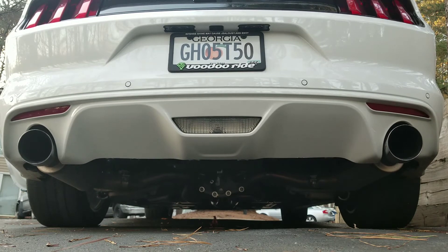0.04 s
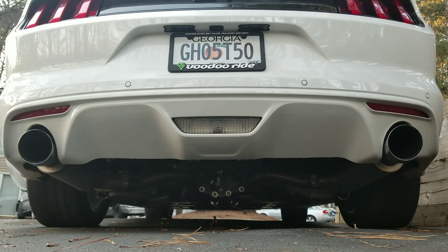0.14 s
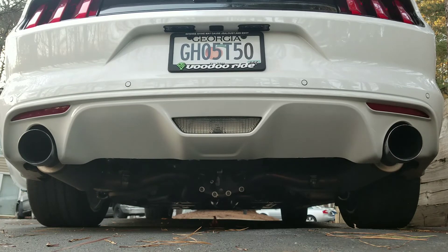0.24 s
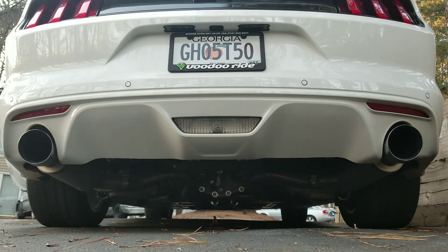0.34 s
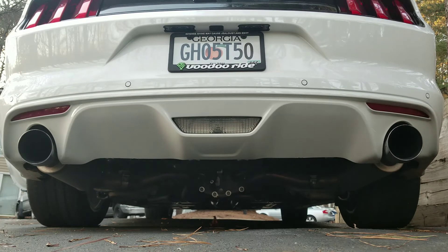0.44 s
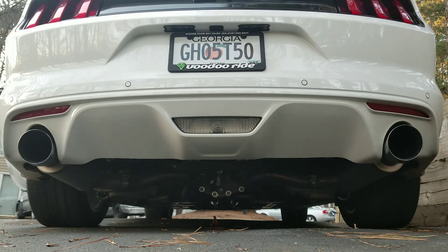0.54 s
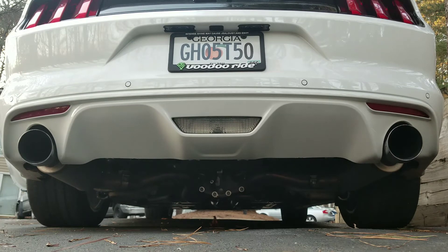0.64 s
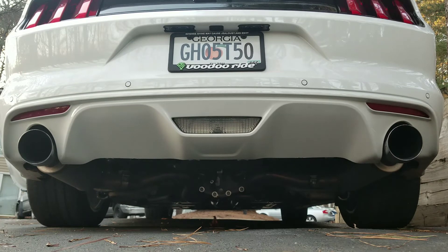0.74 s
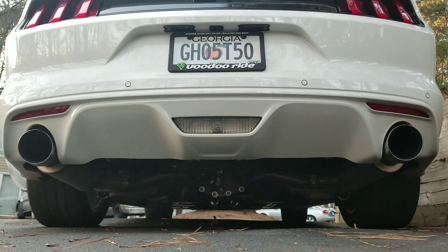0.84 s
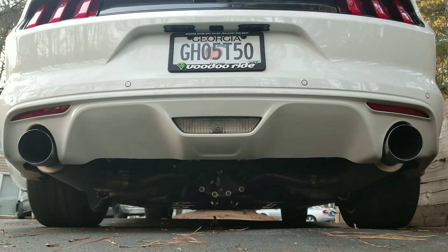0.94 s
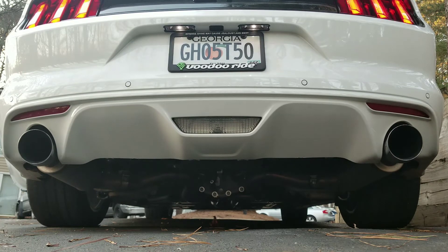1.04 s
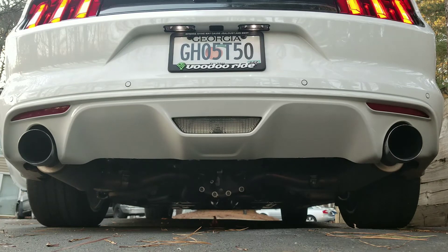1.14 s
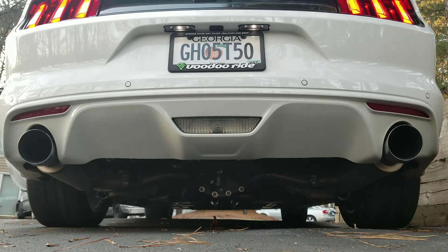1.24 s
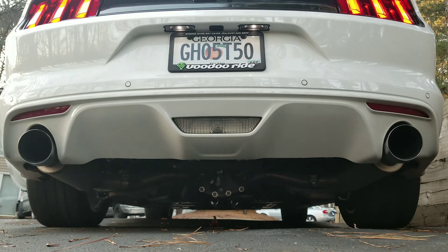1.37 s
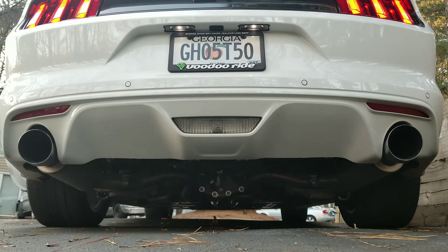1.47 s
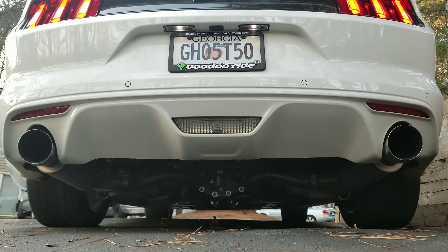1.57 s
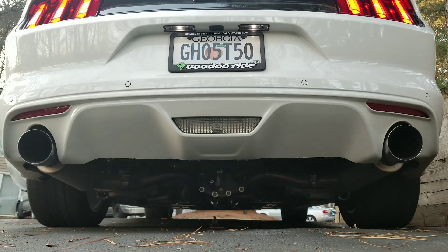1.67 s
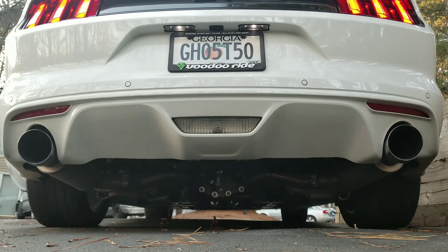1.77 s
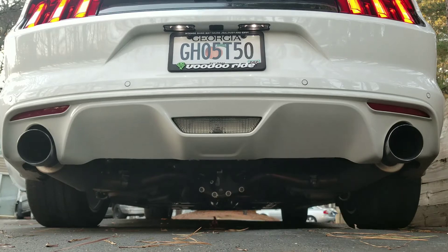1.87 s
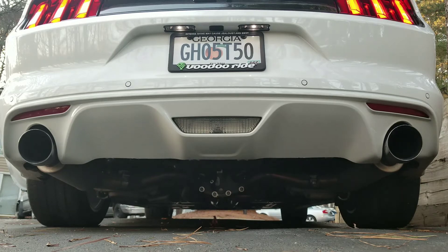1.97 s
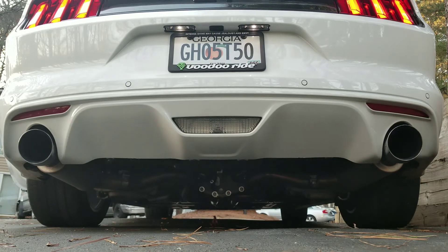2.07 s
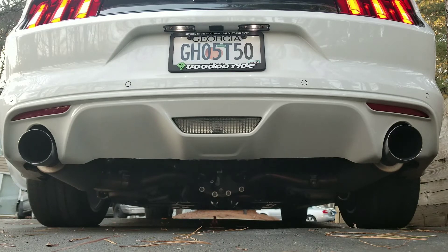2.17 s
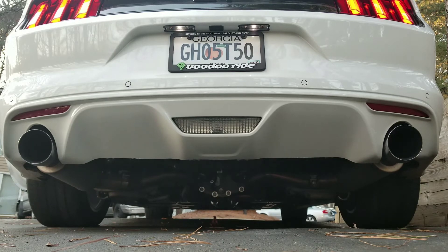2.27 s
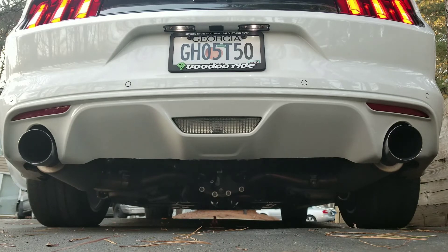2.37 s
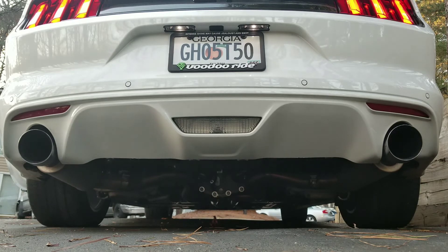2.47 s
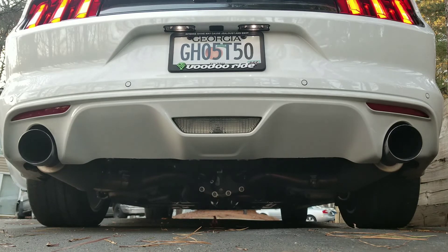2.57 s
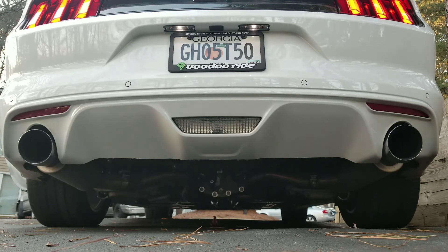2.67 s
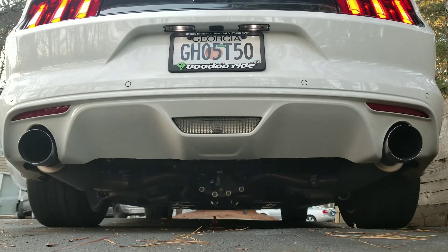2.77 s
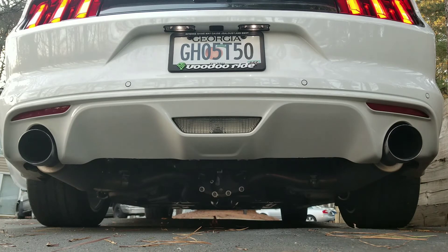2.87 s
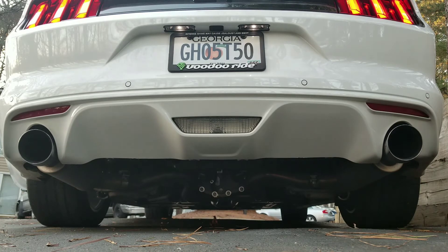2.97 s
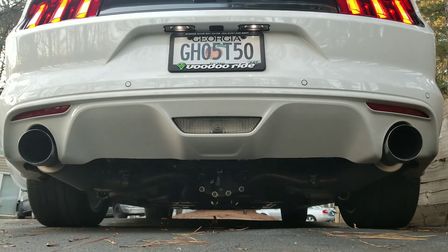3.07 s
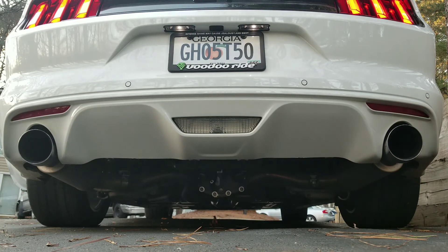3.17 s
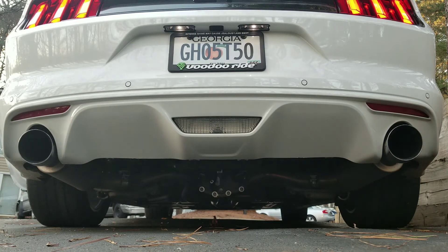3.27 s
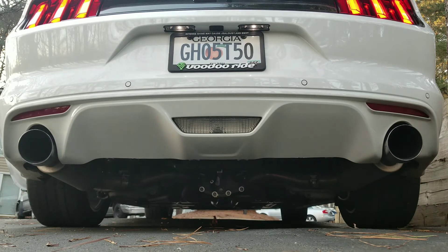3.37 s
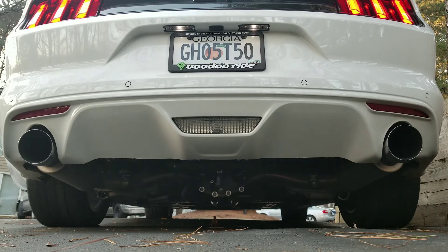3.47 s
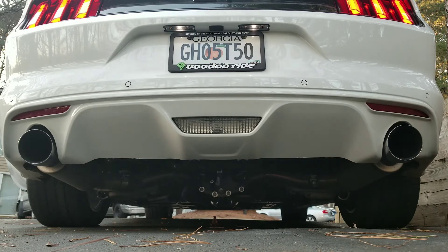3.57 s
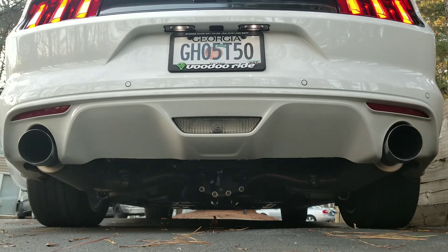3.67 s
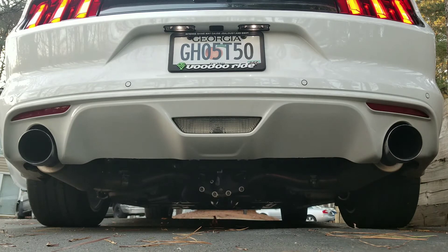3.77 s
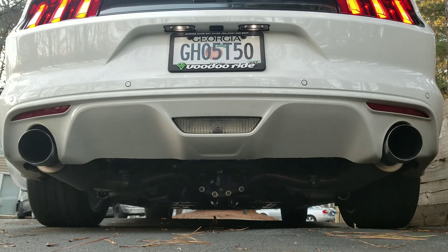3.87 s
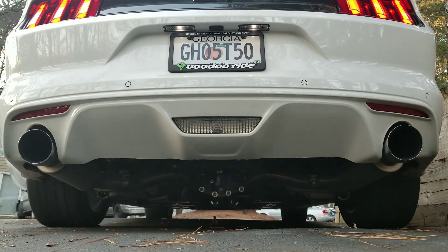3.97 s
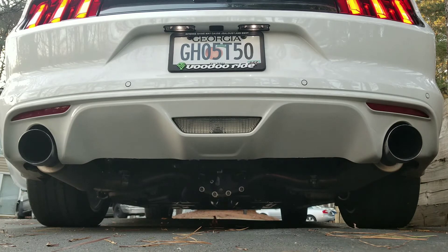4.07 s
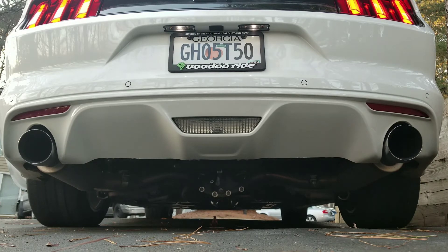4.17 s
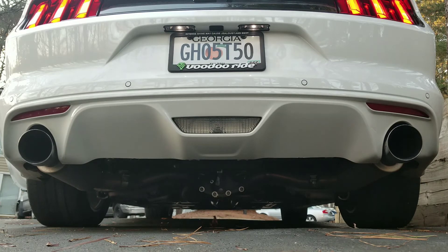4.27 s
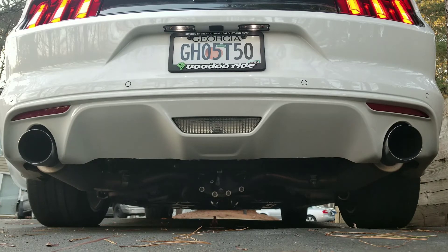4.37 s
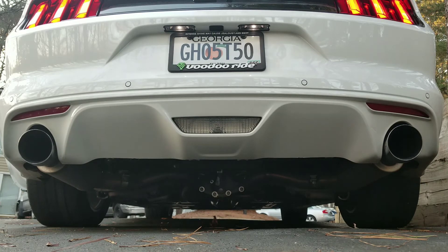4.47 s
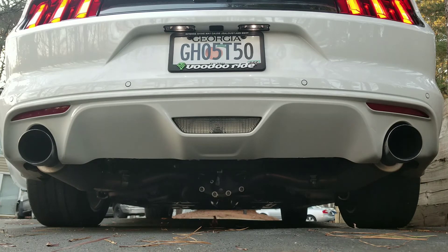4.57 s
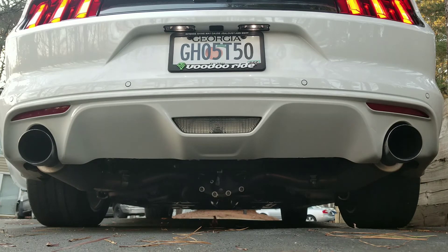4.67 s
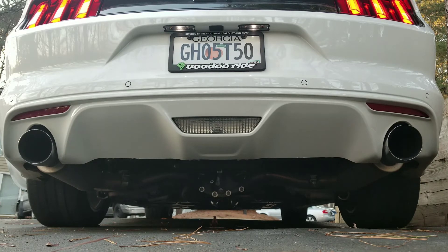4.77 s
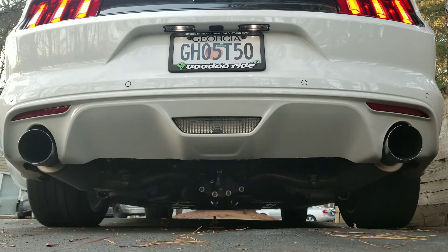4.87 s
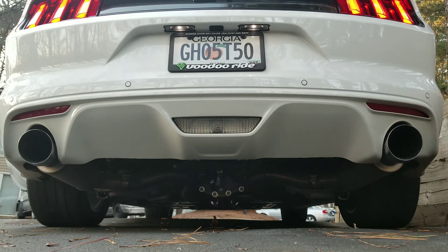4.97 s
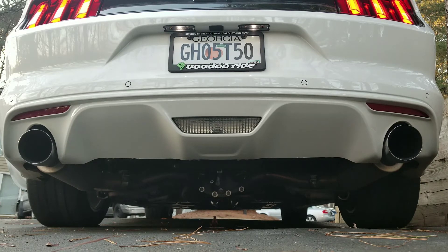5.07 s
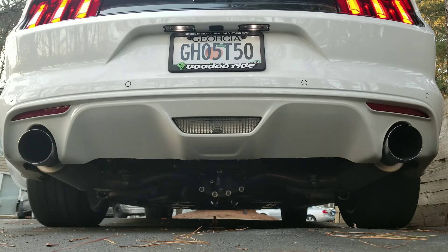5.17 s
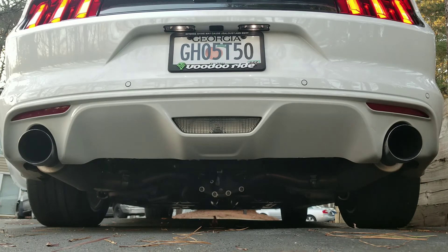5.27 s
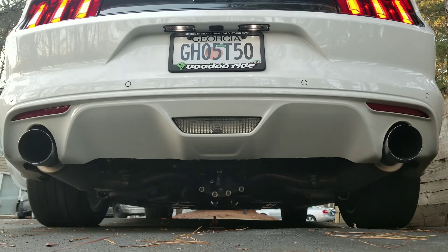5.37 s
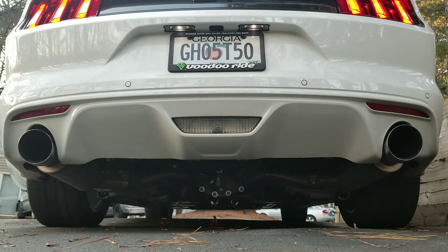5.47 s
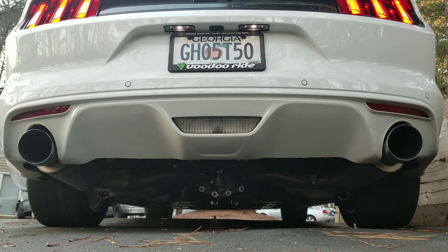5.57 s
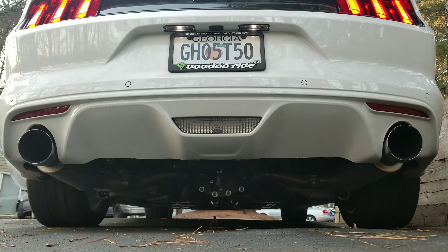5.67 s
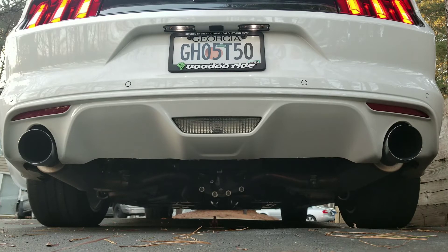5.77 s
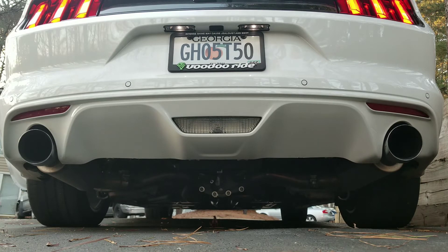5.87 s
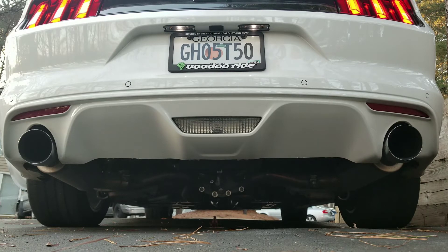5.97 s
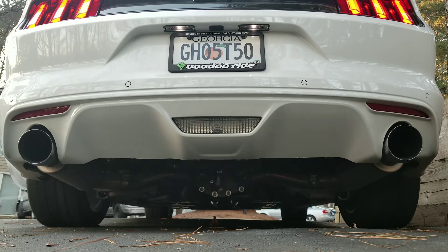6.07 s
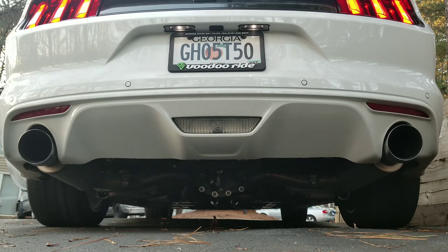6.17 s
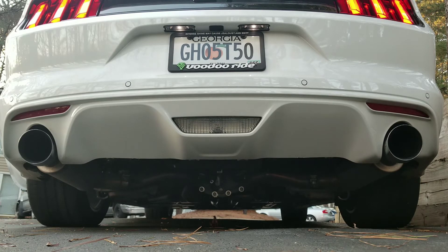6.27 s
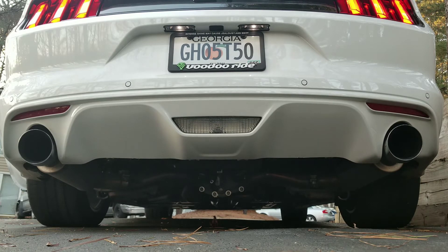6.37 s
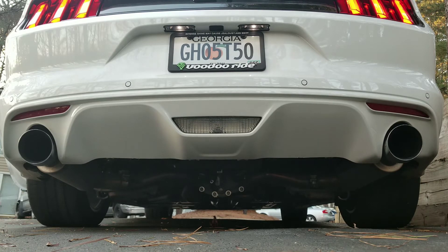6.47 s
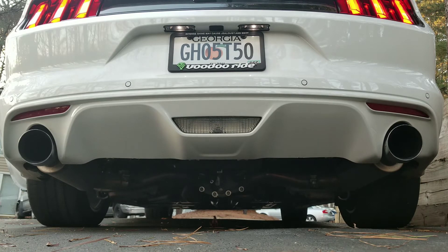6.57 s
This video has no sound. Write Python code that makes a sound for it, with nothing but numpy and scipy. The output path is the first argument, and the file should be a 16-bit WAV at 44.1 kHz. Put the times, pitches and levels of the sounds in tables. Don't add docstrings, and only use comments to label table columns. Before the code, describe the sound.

Outdoors, with stereo microphones low and close behind a car's twin tailpipes. From 0 s there is only a soft, dull hum of distant traffic, with the tail of a small metal rattle vanishing almost at once. At about 1.2 s the starter clashes into gear and grinds, a gritty metallic whine pulsing over about five compressions between 1.5 and 1.95 s, while hollow low puffs ring in the pipes. Around 2.0 s the V8 catches with a heavy, booming thump and flares loudly, barking and raspy, fastest from 2.2 to 2.6 s; a faint pinion whirr is buried beneath. The revs fall until roughly 3.5 s, leaving a deep, droning fast idle with a lumpy eight-beat burble, throaty rasp and slight gassy hiss. It dips a little near 3.5 s, grows somewhat fuller from 4.5 s, and continues steadily to the end at 6.6 s, still running.

```python
import sys
import numpy as np
from scipy import signal
from scipy.fft import rfft, irfft, next_fast_len
from scipy.io import wavfile
from scipy.ndimage import uniform_filter1d, minimum_filter1d

SR = 44100
rng = np.random.default_rng(int(sys.argv[2]) if len(sys.argv) > 2 else 0)


def transcribe(u):
    v = np.clip(np.atleast_2d(u).T, -1, 1)
    q = np.round(v * 32767).astype(np.int16)
    wavfile.write(sys.argv[1], SR, q)


def gain_from_db(level_db):
    decades = np.asarray(level_db, float) / 20
    return 10 ** decades


N = 291942
T = np.arange(N) / SR

# (frequency [Hz], density [dB per Hz])
TOWN_SPECTRUM = [(15, -47), (25, -25), (54, -6), (88, -2), (106, -0.5), (190, -3.5), (236, -11), (669, -13),
                 (1300, -23.5), (2760, -61), (8030, -54), (9170, -49), (14800, -63.5)]
TOWN_DB = -44.5

OVERRUN_S, OVERRUN_DB, OVERRUN_HZ, OVERRUN_FADE_S = 2.22, -54.5, 2660, 0.16

# (time [s], peak level [dB], ring [Hz], width [Hz])
PUFFS = [(1.199, -30.5, 92, 25), (1.319, -33, 113, 25), (1.402, -11.5, 89.26, 6.3), (1.409, -21, 46, 14),
         (1.428, -15.5, 88.26, 6.03), (1.405, -41.5, 218, 8.5), (1.41, -43.5, 301, 7),
         (1.53, -29, 61.5, 11), (1.61, -31, 47.6, 11), (1.62, -32, 125, 20), (1.69, -34.5, 88, 11),
         (1.76, -32.5, 112, 13.3), (1.799, -33.5, 47.3, 4), (1.901, -27, 68.2, 15), (1.975, -17, 113.2, 26),
         (2.008, -24, 714, 45), (2.016, -12, 47, 11), (2.047, -19, 325, 12), (2.011, 1, 113, 21.4),
         (2.0434, -5, 118, 11), (2.116, -6, 85.3, 14)]

# (time [s], grind level [dB], gear mesh [Hz])
STARTER = [
    (1.15, -33.5, 476.6),
    (1.3, -30, 552),
    (1.38, -31, 539),
    (1.44, -27.5, 494),
    (1.53, -36, 470.8),
    (1.97, -39, 447.8),
    (2.05, -40.5, 501),
    (2.3, -55, 514),
]
# (time [s], peak level [dB], length [s], housing knock [dB])
STROKES = [
    (1.52, -23, 0.078, -42),
    (1.631, -23, 0.068, -41),
    (1.73, -21.5, 0.059, -37),
    (1.818, -20, 0.06, -35.5),
    (1.907, -20.5, 0.12, -35.5),
]
# (frequency [Hz], width [Hz], level [dB])
HOUSING = [(442.8, 4.5, -2.5), (552, 26, -2), (829, 15, 3), (1023, 8.5, 7.5), (1182, 110, 0),
           (1305, 50, -1.5), (1890, 32, -3), (2122, 27, -11.5), (2320, 42, -8.5), (2553, 41, -10.5),
           (2930, 84, -17), (3320, 45, -12.5), (3900, 61, -9.5), (4090, 40, -10.5), (4200, 26, -27),
           (7250, 940, -26.5)]
# (frequency [Hz], density [dB per Hz])
GRIT_SPECTRUM = [(110, -28.5), (180, -18), (246, -14), (429, -8), (470, -9.5), (555, -8.5), (643, -4.5),
                 (1020, -8.5), (1320, -25.5), (1560, -18.5), (2390, -7.5), (5480, -26), (7500, -21),
                 (14800, -51)]
CLASH_S, CLASH_DB, CLASH_RISE_S, CLASH_FALL_S = 1.172, -17.5, 0.019, 0.014

# (time [s], firing rate [Hz])
FIRING_RATE = [(1.97, 42.6), (2.07, 56.5), (2.2, 104.21), (2.33, 107.2), (2.52, 107.24), (2.66, 104.04),
               (2.85, 96.3), (3.1, 88.26), (3.4, 86.51), (3.56, 83.04), (3.8, 85.06), (4.1, 85.9),
               (4.9, 85.44), (5.3, 84.8), (5.9, 85.19), (6.2, 86.02), (6.47, 84.74), (6.62, 84.7)]
# (time [s], bark level [dB])
EFFORT = [(2.004, -42.5), (2.013, -16.5), (2.06, -12), (2.2, -9), (2.35, -11.5), (2.55, -14), (2.87, -17.5),
          (2.98, -15.5), (3.1, -17.5), (3.5, -19.5), (4.0, -18), (4.6, -15.5), (5.0, -15), (5.7, -16),
          (6.2, -16), (6.62, -15.5)]
# (frequency [Hz], level [dB])
ORDER_RESPONSE = [(40, 5.5), (60, -13), (86, -0.5), (115, -1.5), (135, -13), (165, -42.5), (178, -26),
                  (195, -9.5), (220, -8)]
# (frequency [Hz], width [Hz], level [dB], signed polarity gain [1])
PIPE_MODES = [(109.7, 20.7, 0.67, -1.05), (129.5, 34.8, 1.5, 0.99), (168.6, 8.8, -6.5, 1.0),
              (253.8, 15, -11, 0.97), (285.3, 11, -13, 1.0), (334.4, 8.3, -21.5, 1.0),
              (405.6, 19, -21.5, -0.53), (445, 34, -16.5, -1.1), (511.8, 13.0, -14.5, -1.0),
              (540.6, 13.0, -15, -1.0), (627.0, 19, -16.5, -1.0), (698.3, 31.0, -22, -1.0),
              (751.8, 11, -22.5, -1.1)]
# (long route [dB], its lag [ms], short route [dB], its lead [ms])
IDLE = [(0.8, 0.44, -4, 3.5), (1.3, -0.85, -8, 2.7), (-3.5, -0.23, -3, 3.4), (-6.5, 0.2, -7, 2.8),
        (0.46, -0.82, -6.5, 3.7), (-0.9, -0.5, -12, 5.5), (-2.5, 0.2, -11, 5.1), (-4, 0.69, -6.5, 3.6)]
# (long route [dB], its lag [ms], short route [dB], its lead [ms])
FLARE = [(3.0, -0.6, -12, 4.7), (-4.5, -1.4, -7.5, 5.7), (-4, -1.8, -18.5, 6.4), (-3.5, -0.1, -2.5, 5.7),
         (-1.5, -1.5, -5, 6.7), (-0.5, -1.3, 0.7, 5.3), (-4, -0.1, -15.5, 7.9), (-5.5, -0.9, -1.4, 4.7)]
# (long route [dB], short route [dB])
WARMING = [(0.4, 0.6), (0.15, 2.1), (1, -0.2), (1.2, -0.1), (-0.8, -0.7), (0.05, -0.5), (0.1, .3),
           (-1.3, -0.4)]
# (frequency [Hz], width [Hz], level [dB])
RASP_MODES = [(655, 32, 1.5), (716.6, 30, 11.5), (762, 77, 2.5), (746, 47, -11), (785, 22, -20),
              (870, 15, -24), (905, 10, -25), (720, 130, -6), (1310, 50, -36.5), (1430, 14, -30)]
# (flare [dB], settling [dB], warm [dB], warm lag [ms])
RASP_DRIVE = [(1.5, -6, -7, 0.073), (-5.5, -7, -10, 0.13), (-4.5, 1, 4, 3.5), (0.5, -5, -5.5, 0.2),
              (-6.5, -5, -3.5, 0.077), (0.5, 2.5, -7.5, 0.048), (-4.5, -1, -1.5, 0.11),
              (-10, -10.5, -10.5, 0.075)]
# (frequency [Hz], density [dB per Hz])
HISS_SPECTRUM = [(560, -30.5), (950, -4), (1020, -9.5), (1120, -10), (1470, -15), (1580, -26), (1960, -19),
                 (2200, -23.5), (3290, -22.5), (5780, -32), (8070, -34.5), (9050, -48), (13100, -34.5),
                 (14800, -43.5)]

PHASE_REF_S = 2.2
TUNED_HZ = 83.5
BOOM_DB, ABOVE_DB_PER_HZ, BELOW_DB_PER_HZ = 7, -0.33, -0.4
HISS_DB, HISS_DB_PER_HZ = -33.5, -0.2542
TICK_DB, TICK_LAG_S, TICK_S = -9.5, 0.0038, 0.002
SETTLE_S, SHIFT_S, WARM_S, WARM_UP_S = 2.7, 0.25, 4.4, 0.64
ALIKE_HZ = 110


def curves(table):
    s, *columns = np.transpose(table)
    return [np.interp(T, s, c) for c in columns]


def unit(x):
    return x / np.sqrt(np.mean(x ** 2))


def on_log(table, hz):
    points = np.transpose(table)
    return np.interp(np.log(np.maximum(hz, 1)), np.log(points[0]), points[1])


def colour(x, table):
    size = next_fast_len(N)
    bins_hz = np.arange(size // 2 + 1) * SR / size
    return unit(irfft(rfft(x, size) * gain_from_db(on_log(table, bins_hz)), size)[..., :N])


def ring(x, hz, width_hz):
    return signal.lfilter(*signal.iirpeak(hz, hz / width_hz, fs=SR), x)


def decay(x, fall_s):
    return signal.lfilter([1], [1, -np.exp(-1 / (fall_s * SR))], x)


def lowpass(x, order, hz):
    return signal.sosfilt(signal.butter(order, hz, fs=SR, output="sos"), x)


def clicks(times_s, sizes):
    at = np.clip(times_s * SR, 0, N - 2)
    whole = at.astype(int)
    part = at - whole
    return np.bincount(whole, sizes * (1 - part), N) + np.bincount(whole + 1, sizes * part, N)


def walk(rate_hz):
    k = int(SR / rate_hz)
    held = np.repeat(rng.standard_normal(N // k + 1), k)
    return uniform_filter1d(uniform_filter1d(held, k), k)[:N]


def pair(x, lag_ms, pan_db):
    return np.array([gain_from_db(pan_db / 2) * np.interp(T - lag_ms / 1000, T, x), gain_from_db(-pan_db / 2) * x])


def wide(table, likeness):
    mid, side = rng.standard_normal((2, N))
    share = np.sqrt((1 - likeness) / (1 + likeness))
    return colour(np.array([mid + share * side, mid - share * side]), table)


def town():
    out, swell = 0, walk(0.5)
    for hz in 28 * 2 ** np.arange(0, 9.2, 0.5):
        noise = rng.standard_normal((2, N))
        mid, side = ring(ring(noise, hz, hz / 2.9), hz, hz / 2.9)
        level_db = on_log(TOWN_SPECTRUM, hz) + 1.5 * swell + 2.0 * walk(9)
        out = out + gain_from_db(level_db) * (mid + min(hz / 600, 1) * side * np.array([[1], [-1]]))
    return gain_from_db(TOWN_DB) * out / np.std(out[:, :SR])


def jingle():
    fade = 1 / (1 + np.exp(np.clip((T - 0.04) / 0.0049, -30, 30))) + 0.12 * np.exp(-T / 0.05)
    noise = rng.standard_normal((2, N))
    tone = gain_from_db(-54.5) * unit(ring(noise, 3460, 90)) + gain_from_db(-66.5) * unit(ring(noise, 4300, 350))
    return fade * (tone + gain_from_db(-69.5) * unit(ring(noise, 8200, 4100)))


def overrun():
    age = np.maximum(T - OVERRUN_S + OVERRUN_FADE_S, 0) / OVERRUN_FADE_S
    whirr = unit(ring(ring(rng.standard_normal((2, N)), OVERRUN_HZ, 700), OVERRUN_HZ, 700))
    return gain_from_db(OVERRUN_DB + 3.0 * walk(60)) * age ** 2 * np.exp(2 - 2 * age) * whirr


def puffs():
    out = np.zeros(N)
    for start_s, peak_db, hz, width_hz in PUFFS:
        age = np.maximum(T - start_s, 0) * np.pi * width_hz
        out += gain_from_db(peak_db) * age * np.exp(1 - age) * np.sin(2 * np.pi * hz * (T - start_s))
    return out


def starter():
    grind_db, mesh_hz = curves(STARTER)
    since_s = T - CLASH_S
    rise = np.exp(-(np.minimum(since_s, 0) / CLASH_RISE_S) ** 4)
    clash = gain_from_db(CLASH_DB) * np.exp(-np.maximum(since_s, 0) / CLASH_FALL_S)
    load = rise * (gain_from_db(grind_db) + clash) * (T < STARTER[-1][0])
    knock = np.zeros(N)
    for start_s, peak_db, length_s, knock_db in STROKES:
        age_s = np.maximum(T - start_s, 0)
        hold = 1 / (1 + np.exp(np.clip((age_s - length_s) / 0.0053, -30, 30)))
        load = load + gain_from_db(peak_db - 3.5) * (1 - np.exp(-age_s / 0.0092)) * np.exp(-age_s / 0.077) * hold
        mesh_hz = mesh_hz - 30 * (T > start_s) * np.exp(-age_s / 0.019)
        sweep = 880 * age_s + 700 * age_s ** 2
        swell = age_s / 0.021 * np.exp(-age_s / 0.015)
        knock += gain_from_db(knock_db + 18) * swell * np.sin(2 * np.pi * sweep)
    turns = np.cumsum(mesh_hz) / SR
    count = np.arange(int(turns[-1]))
    chance = rng.standard_normal((len(count), 2)).T
    teeth = clicks(np.interp(count + 0.085 * chance[0], turns, T), gain_from_db(3.0 * chance[1]))
    whine = unit(sum(gain_from_db(db) * ring(teeth, hz, width_hz) for hz, width_hz, db in HOUSING))
    grit = gain_from_db(-8 + 3.2 * walk(90) + np.array([[-1.8], [1.8]])) * wide(GRIT_SPECTRUM, 0.41)
    return load * (gain_from_db(-4.5) * pair(whine, 0.16, 1.2) + grit) + pair(knock, 0.046, 1.1)


def engine_drone(hz, turns):
    first, second = gain_from_db(on_log(ORDER_RESPONSE, hz)), gain_from_db(on_log(ORDER_RESPONSE, 2 * hz))
    drone = first * np.cos(2 * np.pi * turns) - second * np.cos(4 * np.pi * turns)
    lope = 0.063 * np.cos(2 * np.pi * turns * 3 / 8) + 0.05 * np.cos(2 * np.pi * turns / 4)
    return drone * (1 + lope) * gain_from_db(0.3 * walk(28)) * np.sqrt(2 / (first ** 2 + second ** 2))


def pipes(x):
    rung = sum(sign * gain_from_db(db) * ring(x, hz, width_hz) for hz, width_hz, db, sign in PIPE_MODES)
    return lowpass(rung, 8, 860)


def exhaust_bark(late, early, gate):
    tumble = gain_from_db(-53) * gate * wide([(30, 8), (80, -5), (400, 0), (900, 4)], 0.9)
    return unit(pipes(pair(late, 0.16, 0.53) + pair(early, 0.16, 2.9) + tumble))


def tailpipe_rasp(front):
    wake = decay(front, 0.0085) * gain_from_db(-28.5) * wide([(300, 0.00044), (2000, 0)], 1.0)
    drive = pair(front, 0.22, 0) + wake
    rasp = 0
    for hz, width_hz, db in RASP_MODES:
        rasp = rasp + gain_from_db(db) * ring(ring(drive, hz, 2 * width_hz), hz, 2 * width_hz)
    return unit(lowpass(rasp, 6, 1540)) * gain_from_db(np.array([[1.9], [-1.9]]))


def exhaust_hiss(gate, spits):
    tick = unit(decay(spits, TICK_S))
    noise = wide(HISS_SPECTRUM, 0.056)
    return unit((gate + 0.16 + gain_from_db(TICK_DB) * tick) * noise) * gain_from_db(np.array([[-1.2], [1.2]]))


def engine():
    hz, = curves(FIRING_RATE)
    turns = np.cumsum(hz) / SR
    turns += 0.0586 - np.interp(PHASE_REF_S, T, turns)
    bark_db, = curves(EFFORT)
    above_hz, below_hz = np.maximum(hz - TUNED_HZ, 0), np.maximum(TUNED_HZ - 3 - hz, 0)
    drone_db = bark_db + BOOM_DB + ABOVE_DB_PER_HZ * above_hz + BELOW_DB_PER_HZ * below_hz
    hiss_db = bark_db + HISS_DB + HISS_DB_PER_HZ * above_hz + 0.12 * below_hz

    count = np.arange(-16, int(turns[-1]))
    cylinder = count % 8
    fired_s = np.interp(count + 0.25, turns, T)
    settled = np.clip((fired_s - SETTLE_S) / SHIFT_S, 0, 1)
    warm = np.clip((fired_s - WARM_S) / WARM_UP_S, 0, 1)
    flare, idle = np.array(FLARE)[cylinder].T, np.array(IDLE)[cylinder].T
    long_db, lag_ms, short_db, lead_ms = (1 - settled) * flare + settled * idle
    warm_long_db, warm_short_db = np.array(WARMING)[cylinder].T
    long_db = long_db + warm * warm_long_db
    short_db = short_db + warm * warm_short_db

    spread = [[0.07e-3], [0.8], [0.09e-3], [1.1]]
    late_s, late_db, early_s, early_db = rng.standard_normal((len(count), 4)).T * spread
    late = clicks(fired_s + lag_ms / 1000 + late_s, gain_from_db(long_db + late_db))
    early = clicks(fired_s - lead_ms / 1000 + early_s, gain_from_db(short_db + early_db))
    gate = unit(decay(late + early, 0.018))
    bark = exhaust_bark(late, early, gate)

    flare_db, settling_db, warm_db, warm_ms = np.array(RASP_DRIVE)[cylinder].T
    drive_db = flare_db + settled * (settling_db - flare_db) + warm * (warm_db - settling_db)
    front = clicks(fired_s + (lag_ms + warm * warm_ms) / 1000 + late_s, gain_from_db(drive_db + early_db))
    bark += gain_from_db(-17 + 0.22 * above_hz + 0.056 * below_hz) * tailpipe_rasp(front)
    bark += gain_from_db(-24) * wide([(12, -4), (45, 0), (70, -8), (100, -40), (200, -120)], 0.998)

    hiss = exhaust_hiss(gate, clicks(fired_s + TICK_LAG_S, gain_from_db(4.3 * early_db)))
    drone = engine_drone(hz, turns)
    running = T > EFFORT[0][0]
    return running * (gain_from_db(drone_db) * drone + gain_from_db(bark_db) * bark + gain_from_db(hiss_db) * hiss)


def scene():
    left, right = town() + jingle() + overrun() + puffs() + starter() + engine()
    side = signal.sosfilt(signal.butter(1, ALIKE_HZ, "high", fs=SR, output="sos"), left - right)
    return (left + right + np.array([side, -side])) / 2


def low_pass(x):
    return signal.sosfilt(signal.butter(12, 14990, fs=SR, output="sos"), x)


def record(dry):
    room = np.minimum(1, 0.99 / (np.abs(dry).max(axis=0) + 1e-9))
    held = minimum_filter1d(room, size=265)
    gain = uniform_filter1d(uniform_filter1d(held, size=132), size=132)
    return low_pass(dry * gain + 0.0016)


dry = scene()
out = record(dry)
transcribe(out)
```